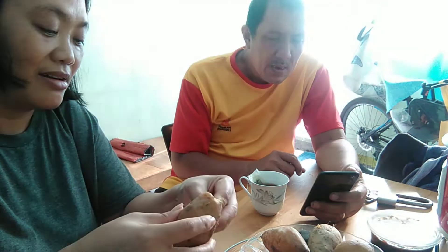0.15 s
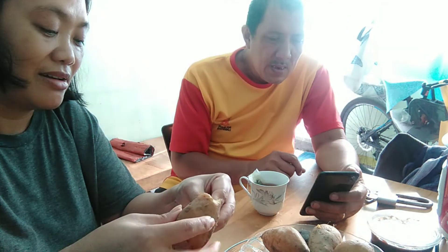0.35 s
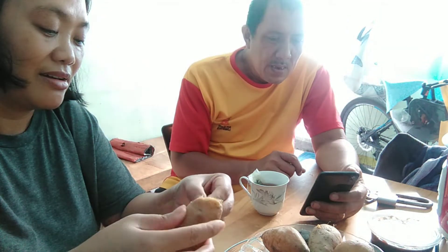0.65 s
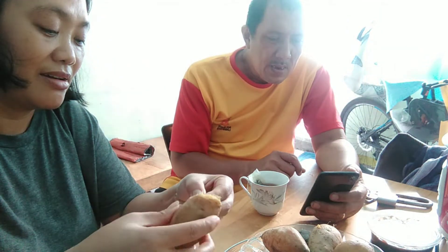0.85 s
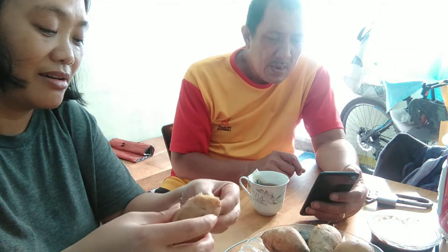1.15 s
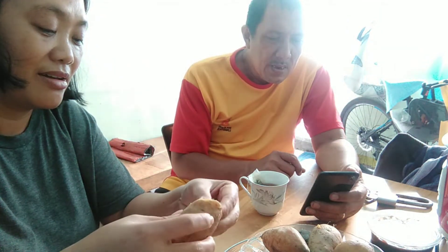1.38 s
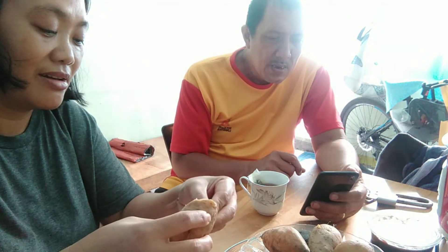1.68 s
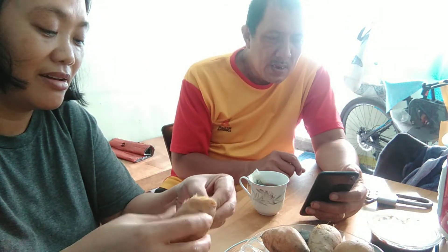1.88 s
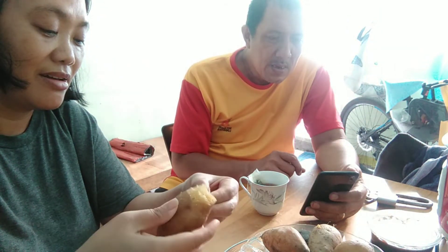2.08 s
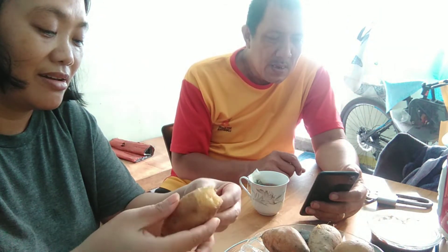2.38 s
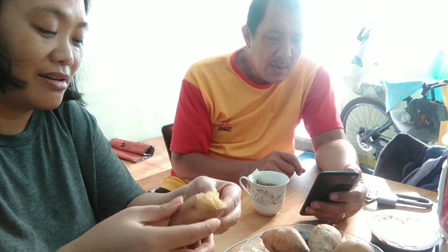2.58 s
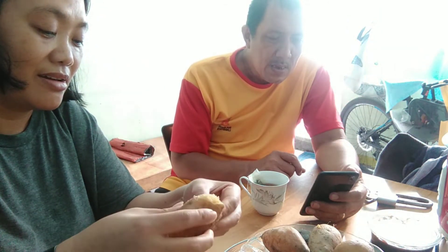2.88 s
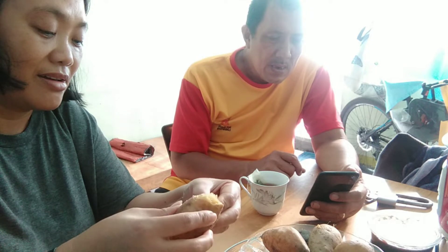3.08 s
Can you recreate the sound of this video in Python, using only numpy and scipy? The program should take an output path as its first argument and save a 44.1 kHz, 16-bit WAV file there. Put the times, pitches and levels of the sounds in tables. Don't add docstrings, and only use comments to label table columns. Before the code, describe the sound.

Fingers peel sweet potato skin with dry, bright, scratchy rubbing, close up. A stroke swells twice from 0 to 0.65 s, a hard then lighter one lasts to 1.24, a long even push to 1.86, a quick fading one to 2.47 with a squeaky snag near 2.28, a short hard push to 2.8, then a softer last stroke. Faint low room drone and wavering distant motor; thinned, slightly watery treble.

```python
import sys
import numpy as np
from scipy import signal
from scipy.fft import rfft, irfft
from scipy.io import wavfile
from scipy.ndimage import uniform_filter1d

SR = 44100
rng = np.random.default_rng(int(sys.argv[2]) if len(sys.argv) > 2 else 0)


def gain_from_db(level_db):
    decades = np.asarray(level_db, float) / 20
    return 10 ** decades


def master_out(mix):
    frames = np.transpose(np.atleast_2d(mix))
    ceiling = np.clip(frames, -1, 1)
    pcm = np.round(ceiling * 32767).astype(np.int16)
    wavfile.write(sys.argv[1], SR, pcm)


N = 143325


def evened(x):
    return x / np.sqrt(np.mean(x ** 2) + 1e-20)


def read(points, hz):
    f, value = np.transpose(points)
    return np.interp(np.log(hz + 1), np.log(f + 1), value)


def smoothed(field, bins, frames):
    return uniform_filter1d(uniform_filter1d(field, size=bins, axis=0), size=frames, axis=1)


def patches(shape, bins, frames):
    return evened(smoothed(rng.standard_normal(shape[::-1]).T, bins, frames))


def bump(hz, centre_hz, width_hz):
    return 1 / (1 + ((hz - centre_hz) / width_hz) ** 2)


# time in seconds, pressure in dB.
STROKES = [
    [(0.0, -51.5), (0.102, -60), (0.128, -62.5), (0.136, -54), (0.156, -46.5), (0.258, -41), (0.388, -50.5),
     (0.512, -46.5), (0.66, -54.5)],
    [(0.67, -57), (0.71, -47), (0.85, -42), (0.932, -51.5), (1.048, -46), (1.1, -48.5), (1.192, -57.5),
     (1.214, -58.5), (1.24, -64)],
    [(1.25, -57), (1.264, -55.5), (1.286, -46), (1.472, -47.5), (1.492, -49.5), (1.608, -46.5), (1.74, -51),
     (1.842, -56.5), (1.86, -55.5)],
    [(1.87, -60), (1.888, -52), (1.924, -44.5), (1.978, -45.5), (2.116, -56.5), (2.208, -49), (2.292, -51),
     (2.42, -60), (2.47, -68)],
    [(2.475, -69), (2.485, -56), (2.521, -45.5), (2.629, -45), (2.639, -42), (2.689, -42), (2.78, -53)],
]
# time in seconds, pressure in dB.
LAST_STROKE = [(2.81, -55.5), (2.85, -49.5), (2.94, -46.5), (3.02, -48.5), (3.1, -51.5), (3.15, -55),
               (3.2, -61), (3.25, -59.5)]
# time in seconds, level in dB above the rub.
SNAGS = [
    (2.28, 7.5),
    (2.488, 6),
]


def pressure():
    snag_s, trim_db, flutter_db = 0.0014, 1, 0.5
    now = np.arange(N) / SR
    s, push_db = np.concatenate(STROKES + [LAST_STROKE]).T
    snag_db = sum(db * np.exp(-((now - at) / snag_s) ** 2) for at, db in SNAGS)
    flutter = uniform_filter1d(rng.standard_normal(N), size=500)
    flutter = evened(uniform_filter1d(flutter, size=500))
    return np.interp(now, s, push_db) + snag_db + trim_db + flutter_db * flutter


# frequency in Hz, level in dB.
SURFACE = [(600, -31), (1200, -28), (1550, -23.5), (1900, -15.5), (4500, -10), (7000, -12), (10500, -16.5),
           (15800, -29.5)]
# time in seconds, weight of the low end in dB.
WEIGHT = [(.15, 8.5), (.26, 4.5), (.5, 4), (.7, 7.5), (.9, 1), (1.1, 7), (1.27, 2), (1.6, 7), (1.75, 2.5),
          (1.94, 5), (2.12, 11), (2.2, -35), (2.32, 9), (2.5, -1.5), (2.68, 15.5), (2.8, 17.5), (2.95, 3.5),
          (3.2, 0.5)]
# time in seconds, frequency in Hz, level in dB.
SQUEAKS = [
    (.26, 3420, 4.5),
    (.84, 3500, 0.5),
    (1.95, 3400, 1),
    (2.28, 3600, 8.5),
    (2.66, 3570, 6),
]


def scrape_colour(hz, t):
    weight_lo_hz, weight_hi_hz = 1140, 2600
    squeak_width_hz, squeak_s = 200, 0.04
    fixed_db = read(SURFACE, hz)
    fixed_db += 11 * bump(hz, 8397, 870)
    fixed_db += 4.5 * bump(hz, 7550, 177)
    low = np.log(weight_hi_hz / (hz + 1)) / np.log(weight_hi_hz / weight_lo_hz)
    low = np.clip(low, 0, 1) * (hz > 550)
    colour_db = fixed_db[:, None] + np.outer(low, np.interp(t, *np.transpose(WEIGHT)))
    for at, f, db in SQUEAKS:
        colour_db += db * np.outer(bump(hz, f, squeak_width_hz), np.exp(-((t - at) / squeak_s) ** 2))
    return colour_db + 1.0 * patches(colour_db.shape, bins=8, frames=16)


def rubbing():
    scratches_per_s, spread_db = 30000, -0.1
    size = gain_from_db(spread_db * np.minimum(rng.exponential(1, N), 5)) * rng.standard_normal(N)
    scratches = size * (rng.random(N) < scratches_per_s / SR)
    hz, t, z = signal.stft(scratches, SR, nperseg=512, noverlap=384)
    z = z * gain_from_db(scrape_colour(hz, t))
    hiss = evened(signal.istft(z, SR, nperseg=512, noverlap=384)[1][:N])
    return hiss * gain_from_db(pressure())


# frequency in Hz, width in Hz, level in dB.
MOTOR = [(50.4, 8, -11), (64.8, 8, -14), (100.4, 4.6, -1.5), (127.2, 8, -13), (168.2, 9.5, -11),
         (205.8, 8.6, -12), (477.7, 12, -23), (621, 6, -27)]
# time in seconds, load in dB.
MOTOR_LOAD = [(0.0, -63), (0.17, -56.5), (0.41, -67), (0.72, -57), (0.92, -63), (0.97, -56), (1.15, -69),
              (1.47, -54.5), (1.5, -69), (1.74, -50), (1.78, -69), (1.85, -52), (2.04, -54), (2.07, -65),
              (2.7, -55), (2.72, -65.5), (3.19, -52), (3.25, -78)]


def motor():
    hz = np.fft.rfftfreq(N, 1 / SR)
    load = gain_from_db(np.interp(np.arange(N) / SR, *np.transpose(MOTOR_LOAD)))
    out = np.zeros(N)
    for tone_hz, width_hz, db in MOTOR:
        fuzz = evened(irfft(rfft(rng.standard_normal(N)) * bump(hz, tone_hz, width_hz) ** 2, N))
        swell = np.sqrt(uniform_filter1d(fuzz ** 2, size=2205) + 0.091)
        steady = evened(fuzz / swell)
        out += gain_from_db(db) * (load if 80 < tone_hz < 115 else load.mean()) * steady
    return out


# frequency in Hz, level in dB.
ROOM = [(36, -34), (55, 0), (110, -1), (210, -8), (330, -18), (520, -23), (750, -23), (1600, -25)]


def drone():
    level_db, patch_db, top_hz = -58.5, 3.5, 2220
    hz, t, z = signal.stft(rng.standard_normal(N), SR, nperseg=2048, noverlap=1536)
    shape = gain_from_db(read(ROOM, hz)[:, None] + patch_db * patches(z.shape, bins=3, frames=5))
    shape /= 1 + (hz[:, None] / top_hz) ** 4 + (30 / (hz[:, None] + 1)) ** 2
    noise = signal.istft(z * shape, SR, nperseg=2048, noverlap=1536)[1][:N]
    return gain_from_db(level_db) * evened(noise)


def scene():
    return np.tile(rubbing() + drone() + motor(), (2, 1))


# frequency in Hz, level in dB.
NOISE_GUESS = [(250, 0), (450, -5), (650, 8), (1080, 1.5), (1600, 4), (2800, 4.5), (3600, -3), (15000, -18)]


def suppressed(z, hz, t):
    guess_db, patch_db, deepest_db, edge_hz = -91, 2, -19, 15770
    memory = 0.83
    power = smoothed(abs(z) ** 2, bins=2, frames=3)
    start = power[:, :9].mean(1)[:, None] * (t == 0) / (1 - memory)
    power = signal.lfilter([1 - memory], [1, -memory], power + start) + 1e-20
    guess = gain_from_db(guess_db + read(NOISE_GUESS, hz)[:, None] + patch_db * patches(z.shape, bins=2, frames=60))
    gain = np.maximum(1 - guess ** 2 / power, gain_from_db(deepest_db))
    return z * gain * (hz[:, None] < edge_hz)


# time in seconds, low edge in Hz, high edge in Hz.
SPLITS = [(.637, 5200, 6400), (.637, 8300, 9700), (.637, 13800, 15200), (1.682, 5200, 6400),
          (1.797, 4200, 6400), (1.797, 9700, 11800), (2.238, 6300, 7600), (2.238, 10400, 12500),
          (2.262, 7600, 9000), (2.681, 4200, 5700), (2.681, 9700, 11100)]


def ears_apart(z, hz, t):
    split_s, split_db = 0.024, -1
    split = sum(np.outer((hz > lo) & (hz < hi), abs(t - s) < split_s / 2) for s, lo, hi in SPLITS)
    other = signal.stft(rng.standard_normal(N), SR, nperseg=1024, noverlap=768)[2]
    other = other / np.sqrt(np.mean(abs(other) ** 2))
    local = np.sqrt(smoothed(abs(z) ** 2, bins=15, frames=5) + 1e-20)
    return other * local * split * gain_from_db(split_db)


def roll_off(x):
    return signal.sosfilt(signal.butter(12, 15940, fs=SR, output="sos"), x)


def record(dry):
    hz, t, z = signal.stft(dry[0], SR, nperseg=1024, noverlap=768)
    z = z * gain_from_db(-8.5 * bump(hz, 1065, 56.4))[:, None]
    z = suppressed(z, hz, t)
    side = ears_apart(z, hz, t)
    both = signal.istft(np.array([z + side, z - side]), SR, nperseg=1024, noverlap=768)[1][:, :N]
    return roll_off(both)


dry = scene()
out = record(dry)
master_out(out)
```